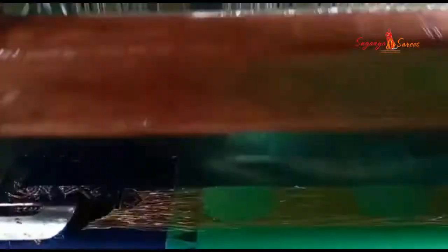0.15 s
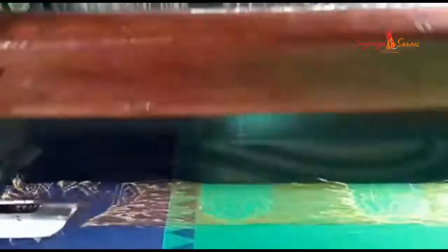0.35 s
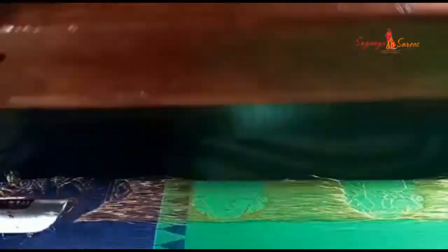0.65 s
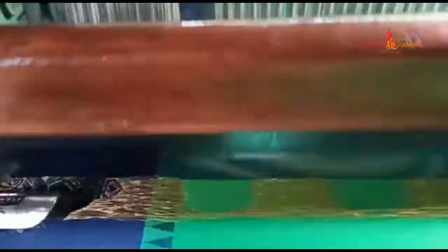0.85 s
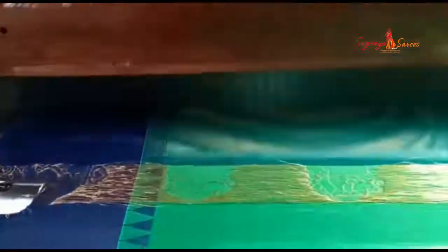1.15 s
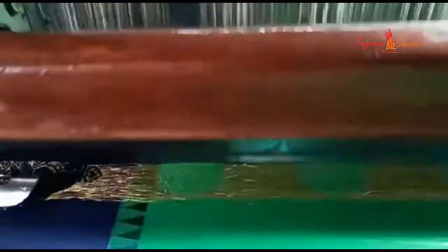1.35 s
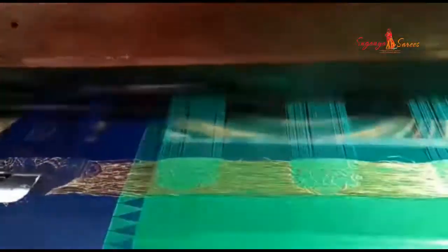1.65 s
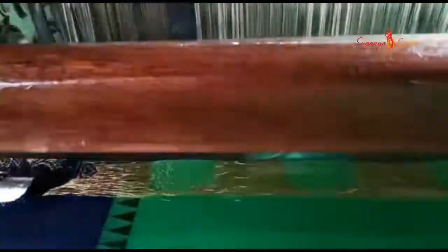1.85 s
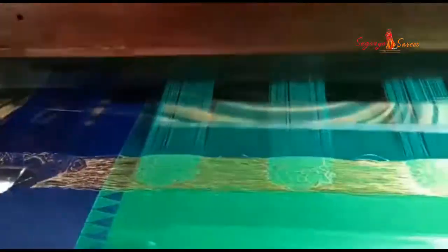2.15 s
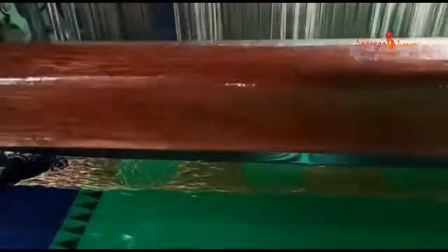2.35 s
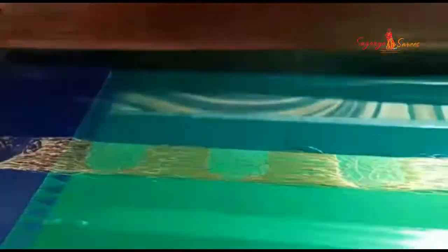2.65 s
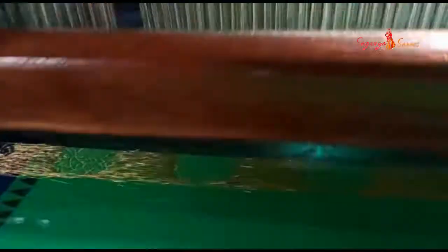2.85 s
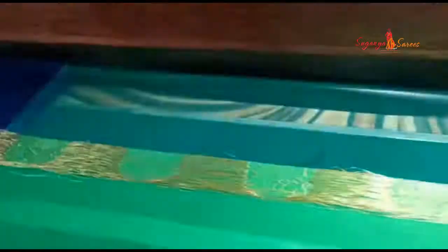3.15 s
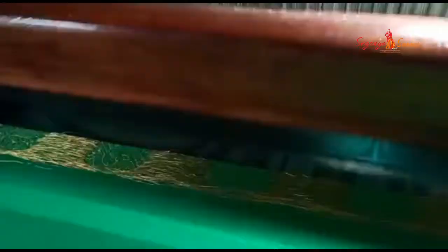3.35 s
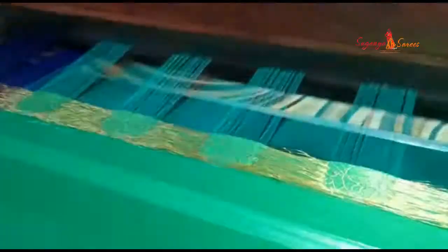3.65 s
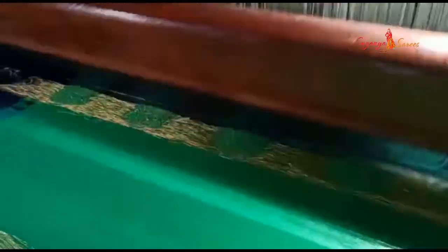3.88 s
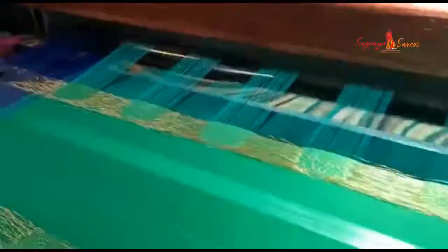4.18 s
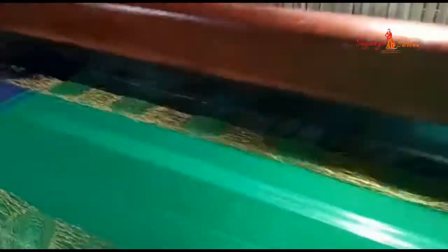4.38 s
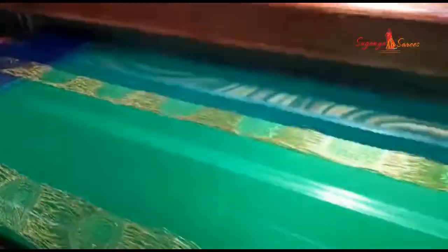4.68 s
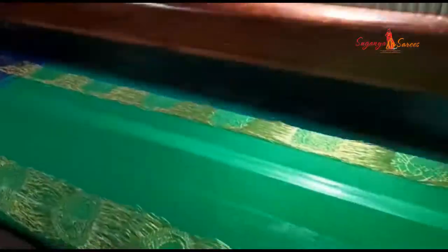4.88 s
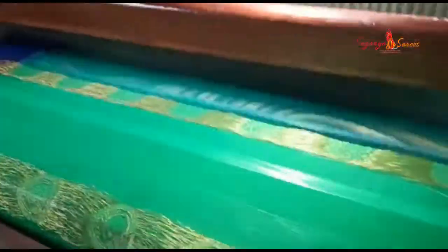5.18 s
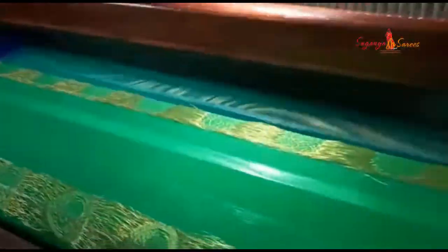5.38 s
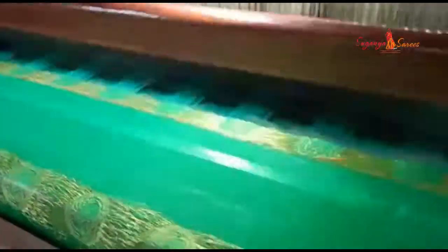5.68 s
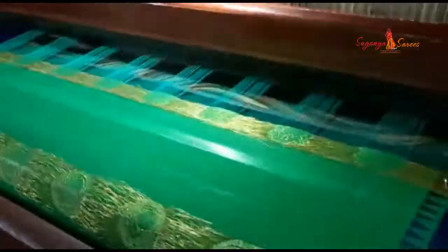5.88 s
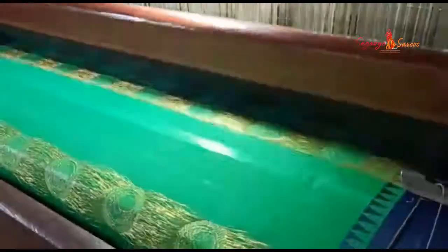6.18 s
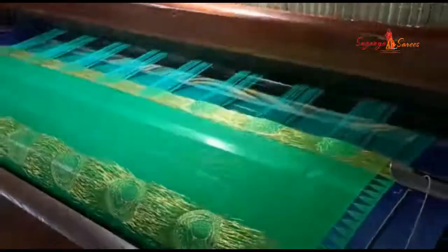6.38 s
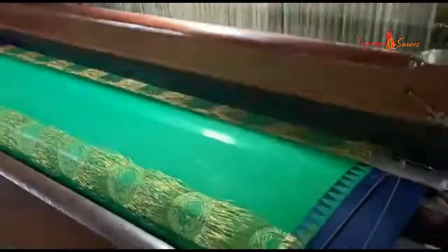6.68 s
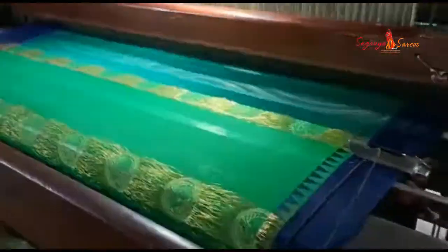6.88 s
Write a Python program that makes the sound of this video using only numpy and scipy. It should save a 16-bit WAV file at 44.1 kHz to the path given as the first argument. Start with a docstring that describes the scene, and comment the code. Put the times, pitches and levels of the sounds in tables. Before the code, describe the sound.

Harsh, rhythmic shuttle loom banging in a weaving shed, with rattling throws, a ringing loose link, and a second loom drifting through the beat.

```python
"""A shuttle power loom weaves close by, two picks every 1.06 s: the picker throws the shuttle, the box catches it,
the far picker throws it back with a rattle and a loose link rings. The picker and lever of a slightly faster loom
drift through this rhythm. Each blow is a short judder of contacts, noise coloured by wood and steel, over swishing
threads and the drive's steady clatter. One slap echo follows; two microphones hear the treble from the right."""
import sys
import numpy as np
from scipy import signal
from scipy.fft import rfft, irfft, next_fast_len
from scipy.io import wavfile
from scipy.ndimage import uniform_filter1d, map_coordinates

SR = 44100
rng = np.random.default_rng(int(sys.argv[2]) if len(sys.argv) > 2 else 0)


def store_pcm(level_fs):
    """Save levels as 16-bit WAV."""
    pcm = np.round(np.clip(level_fs, -1, 1) * 32767).astype(np.int16)
    wavfile.write(sys.argv[1], SR, np.atleast_2d(pcm).T)


N = 310023

# Blows: [t/s, level/dB, wooden knock/dB, steel brightness/dB]; levels are before each part's gain,
# knock and brightness are relative to the part's usual colour
# the near picker throws the shuttle out, once a cycle
PICK_BLOWS = [(-0.026, -17, -4.5, -3), (1.022, -14.5, -1.5, -4.5), (2.076, -19.5, 3.5, 4),
              (3.141, -19.5, -0.5, 3.5), (4.203, -18.5, 1.8, 3), (5.267, -20.5, 0, 1), (6.329, -21, 2, 2.7)]
# the shuttle runs into its near box; every second time it rebounds
BOX_BLOWS = [(0.152, -19.5, -3, -0.5), (1.225, -28.5, 7, -9), (1.29, -30, 4, 0), (2.275, -19.5, -1, -1),
             (3.348, -22.5, 1.5, -3.5), (3.385, -30.5, 6, 5), (4.392, -17.5, 0.5, -5),
             (5.44, -25, 7.5, -3.5), (5.476, -29, 0, 4.5), (6.516, -23, 2, 3)]
# the far picker throws the shuttle back, with a rattle
FAR_PICK_BLOWS = [(0.495, -24, 2.5, -2.5), (1.545, -27.5, 2, -0.5), (2.612, -23, 5, -7),
                  (3.655, -28.5, 5, -2), (4.727, -24.5, 3, -1), (5.8, -23.5, -2.5, -3), (6.85, -22, -2, -2)]
# resonances of the loom frame: [f/Hz, width/Hz, lift/dB]
FRAME_MODES = [(851, 9.8, 3.2), (1273, 23, 6), (1990, 35, 1), (2466, 22, 2.4), (3962, 86, 4.2),
               (4530, 47, 3.1), (4600, 35, 1.7), (6430, 39, 4.7), (6820, 30, 1.7), (6460, 38, 5.5)]

CYCLE_S, CYCLE_START_S = 1.0625, 1.016
BEAT_AT_S, BEAT_WIDTH_S = 0.17, 0.094  # the beater's stroke within the cycle
LULL_AT_S, LULL_WIDTH_S = 0.66, 0.044  # swish and clatter drop briefly


def amp(db):
    """Decibels to gain."""
    return 10 ** (np.asarray(db) / 20)


def rms(x):
    """Root mean square."""
    return np.sqrt(np.mean(np.abs(x) ** 2) + 1e-20)


def along(points, hz):
    """(Hz, value) points read on a log axis."""
    f, v = np.transpose(points)
    return np.interp(np.log(hz + 1), np.log(f + 1), v)


def wobble(rate, size):
    """A smooth random curve, rate knots a second."""
    knots = rng.standard_normal(int(size * rate / SR) + 4)
    return map_coordinates(knots, [np.arange(size) * rate / SR])


def swell(at, width, every):
    """A bell from 0 to 1 that peaks at seconds into the loom's cycle and comes back every so many seconds."""
    since_peak = np.arange(N) / SR - CYCLE_START_S - at
    away = (since_peak + every / 2) % every - every / 2
    return np.exp(-.5 * (away / width) ** 2)


def filtered(x, response):
    """x times a complex response of frequency."""
    size = x.shape[-1]
    padded = next_fast_len(size + SR // 10, True)
    spectrum = rfft(x, padded) * response(np.fft.rfftfreq(padded, 1 / SR))
    return irfft(spectrum, padded)[..., :size]


def part(hz, body, ring):
    """Response of a loom part, of unit power: a broad body with narrow resonances standing on it."""
    peaks = 0
    for centre, width, lift_db in ring:
        resonance = 1j * hz * width / (centre * centre - hz * hz + 1j * hz * width)
        peaks = peaks + (amp(lift_db) - 1) * resonance
    response = amp(along(body, hz)) * (1 + peaks)
    return response / rms(response)


def struck_anew(hz, body, ring, vary_db):
    """No two blows land alike: each favours other groups of the part's many modes."""
    groups = map_coordinates(rng.standard_normal(120), [hz / 200], mode="nearest")  # a knot every 200 Hz
    response = part(hz, body, ring) * amp(vary_db * groups)
    return response / rms(response)


def contacts(size, rate, rough_db):
    """A dense run of tiny contacts: two independent noises of unit power whose shared force flutters."""
    x = rng.standard_normal((2, size)) * amp(rough_db * wobble(rate, size))
    return x / rms(x)


def patchy(x, patchy_db):
    """Loose parts chatter by turns, so the colour shifts from moment to moment."""
    z = signal.stft(x, nperseg=512)[2]
    field = rng.standard_normal(z.shape[1:])
    field = uniform_filter1d(field, size=5, axis=0)  # over frequency
    field = uniform_filter1d(field, size=9, axis=1)  # over time
    return signal.istft(z * amp(patchy_db * field / rms(field)), nperseg=512)[1][:, :N]


def add(track, s, sound):
    """Mix a sound into a track at time s, cut at both ends of the track."""
    start = min(round(s * SR), N - 1)
    sound, start = sound[:, max(-start, 0):], max(start, 0)
    track[:, start:start + sound.shape[1]] += sound[:, :N - start]


def alike(table, knock_db, bright_db):
    """(s, level dB) rows as blows of one colour."""
    return [(s, db, knock_db, bright_db) for s, db in table]


def blows(table, body, ring, gain_db, rise, hold, t60, knock_lag, room_db, rough_db, vary_db, slack_db):
    """Each blow takes up its slack, judders and dies away; heavy wood builds later than steel (times in s)."""
    track, t = np.zeros((2, N)), np.arange(-SR // 20, SR // 2) / SR
    room_t60, slack_time = .5, .014  # s
    wood = lambda hz: 1 / (1 + (hz / 2300) ** 4)  # share of the wood in each frequency
    slack = amp(slack_db) * np.exp(-np.abs(t) / slack_time)  # loose joints rattle around the moment of the blow

    def judder(lag):
        age = np.maximum(t - hold - lag, 0)
        onset = 1 - np.exp(-np.maximum(t, 0) / (rise + lag + 1e-4))
        fall = np.maximum(amp(-60 * age / t60), amp(room_db - 60 * age / room_t60))
        return contacts(len(t), 217.6, rough_db) * np.maximum(onset * fall, slack)

    for s, db, knock_db, bright_db in table:
        knock = filtered(judder(knock_lag), lambda hz: np.sqrt(wood(hz)))
        clash = filtered(judder(0), lambda hz: np.sqrt(1 - wood(hz)))
        tilt = [(1900, knock_db), (2800, 0), (3900, 0), (4900, bright_db)]
        colour = lambda hz: amp(along(tilt, hz)) * struck_anew(hz, body, ring, vary_db)
        add(track, s + t[0], amp(db + gain_db) * filtered(knock + clash, colour))
    return track


def shuttle():
    """The near picker throws the shuttle; the near stick hits its buffer, the shuttle stops in either box."""
    # bodies: [f/Hz, density/dB per Hz]
    pick_body = [(100, -26), (400, -26), (1000, -6.5), (2000, -7.5), (3400, -4.5), (4500, -1.5),
                 (7000, -1.2), (14000, -8)]
    box_body = [(100, -38), (400, -18.5), (1000, -8), (2000, 0.5), (3400, 0.5), (4500, 1.5), (7000, 2.5),
                (14000, -12)]
    stop_body = [(60, -31), (300, -12.5), (900, 0), (1700, 2.5), (2600, -6.5), (4500, 6.5), (8000, -4.5),
                 (15000, -43)]
    # resonances: [f/Hz, width/Hz, lift/dB]
    pick_modes = [(4580, 50, 8.5), (4490, 150, 2.5), (6400, 300, -2), (7240, 44, -4), (8900, 80, 7)]
    box_modes = [(3150, 50, 4), (4280, 40, 3.3), (6350, 270, 3.4), (6300, 40, 2.5), (6650, 50, 2.4)]
    # the shuttle runs into the far box: [t/s, level/dB]
    far_catches = [(0.738, -26.5), (1.785, -22.5), (2.832, -22.5), (3.892, -22), (4.958, -26.5),
                   (6.012, -25.5)]
    thrown = blows(PICK_BLOWS, pick_body, pick_modes, gain_db=2.5, rise=0.0027, hold=0.025, t60=0.19,
                   knock_lag=0.0076, room_db=-15.5, rough_db=2.25, vary_db=-0.2, slack_db=-9)
    caught = blows(BOX_BLOWS, box_body, box_modes, gain_db=1, rise=0.0015, hold=0.036, t60=0.4,
                   knock_lag=.006, room_db=-14, rough_db=1.0, vary_db=2.5, slack_db=-7)
    # the near stick hits its buffer just after each pick
    near_stops = [(s + .024, -31, 0, 1) for s, *_ in PICK_BLOWS]
    stops = near_stops + alike(far_catches, knock_db=-1.1, bright_db=-4.5)
    stopped = blows(stops, stop_body, FRAME_MODES, gain_db=3.5, rise=0.0019, hold=0.011, t60=0.37,
                    knock_lag=0.002, room_db=-21, rough_db=0.0, vary_db=4.5, slack_db=-13)
    return thrown + caught + stopped


def warp():
    """Threads swish as the reed sweeps through them; blows of both pickers and the near box snap heald wires."""
    # colour of threads and wires: [f/Hz, density/dB per Hz]
    warp_body = [(2000, -33), (5000, -17), (7500, 3), (10000, -11.5), (13000, 0.5), (16000, -0.5)]
    colour = lambda hz: amp(along(warp_body, hz))
    sweep_db = 3 * swell(BEAT_AT_S, BEAT_WIDTH_S, CYCLE_S)
    lull_db = -8 * swell(LULL_AT_S, LULL_WIDTH_S, CYCLE_S)
    slack_db = -17 * swell(0.81, 0.094, 2 * CYCLE_S)  # quiet late in every second cycle
    uneven_db = 3.5 * wobble(14, N)
    swish = filtered(contacts(N, 700, 2.6), colour)
    swish = swish / rms(swish) * amp(-37.5 + sweep_db + lull_db + slack_db + uneven_db)

    snaps, t = np.zeros((2, N)), np.arange(SR // 10) / SR
    crack_and_buzz = amp(-60 * t / 0.0054) + amp(-3.0 - 60 * t / 0.18)
    # snap gain in dB, on top of the blow's level and brightness
    for table, snap_db in [(FAR_PICK_BLOWS, 11), (BOX_BLOWS, 4), (PICK_BLOWS, 2.5)]:
        for s, db, _, bright_db in table:
            add(snaps, s, amp(db + bright_db + snap_db) * crack_and_buzz * contacts(len(t), 590, 2.7))
    return swish + filtered(snaps, colour)


def drive():
    """Gears and shafts rumble and clatter in the frame, harder as the beater strokes; the motor hums unsteadily."""
    # body of the drive: [f/Hz, density/dB per Hz]
    drive_body = [(30, -40), (60, -17.5), (110, -9.5), (280, -3.5), (600, -2.5), (1300, 0.5), (2400, -0.5),
                  (4200, 0.34), (7000, -2.5), (9500, -15.5), (14000, -17.5)]
    t = np.arange(N) / SR
    first = swell(BEAT_AT_S, BEAT_WIDTH_S, CYCLE_S)
    second = swell(BEAT_AT_S + CYCLE_S / 2, BEAT_WIDTH_S, CYCLE_S)
    mid_cycle = swell(0.5, 0.093, CYCLE_S)
    lull = swell(LULL_AT_S, LULL_WIDTH_S, CYCLE_S)
    coast = swell(0.95, 0.045, CYCLE_S)  # the drive coasts towards the next pick

    low = lambda hz: 1 / (1 + (hz / 1000) ** 4)  # share of the rumble in each frequency
    frame = lambda hz: part(hz, drive_body, FRAME_MODES)
    rumble = filtered(contacts(N, 40, 1.7), lambda hz: frame(hz) * np.sqrt(low(hz)))
    chatter = patchy(contacts(N, 90, 1.43), patchy_db=2.5)
    clatter = filtered(chatter, lambda hz: frame(hz) * np.sqrt(1 - low(hz)))
    # idle level in dB, then its change at each moment of the cycle
    rumble = rumble / rms(rumble) * amp(-44.5 + 3 * first + 4 * second - 3 * coast)
    clatter = clatter / rms(clatter) * amp(-32.5 + first + mid_cycle - lull)

    hum_hz = 108
    hum_level = amp(-66.5 + 6.6 * wobble(8.2, N))
    hum = hum_level * np.sin(2 * np.pi * hum_hz * t + 1.3 * wobble(11, N))
    return rumble + clatter + hum


def neighbour():
    """The next loom runs a little faster, so its picker and steel lever drift through the rhythm."""
    # its picker: [t/s, level/dB]
    next_picks = [(0.712, -18.5), (1.76, -20), (2.808, -17.5), (3.858, -19.5), (4.906, -20), (5.951, -20),
                  (7.002, -22)]
    # its steel lever drops: [t/s, level/dB, wooden knock/dB, steel brightness/dB]
    lever_drops = [(0.39, -30, 4, 5), (1.432, -32, -4, 5), (2.487, -35, -17, 5), (3.527, -23.5, -4, -3),
                   (4.582, -23, -6.5, -3), (5.625, -26, 0.5, -1.5), (6.68, -32.5, -23, -4)]
    # bodies: [f/Hz, density/dB per Hz]
    picker_body = [(100, -33), (400, -18), (1000, -6), (2000, -4), (3400, -1), (4500, -2.5), (7000, -5),
                   (14000, -14.5)]
    lever_body = [(100, -31), (400, -22), (1000, -6), (2000, -5.5), (3400, -1.5), (4500, 2), (7000, -6),
                  (14000, -19.5)]
    # resonances: [f/Hz, width/Hz, lift/dB]
    picker_modes = [(3210, 40, 4), (3260, 47, 4.7), (3650, 36, 2.1), (3820, 100, 4.7), (5600, 50, 5.2),
                    (6370, 72, 5.1)]
    lever_modes = [(2590, 150, 6.9), (3350, 48, 4.6), (3844, 60, 4.5), (3750, 90, 4)]
    picks = alike(next_picks, knock_db=-5.5, bright_db=-.5)
    picker = blows(picks, picker_body, picker_modes, gain_db=2.5, rise=0.0012, hold=0.014, t60=0.28,
                   knock_lag=0.006, room_db=-12.5, rough_db=0.8, vary_db=0.5, slack_db=-8.5)
    lever = blows(lever_drops, lever_body, lever_modes, gain_db=5.5, rise=0.0017, hold=0.0094, t60=0.26,
                  knock_lag=.003, room_db=-5.5, rough_db=2.0, vary_db=1.6, slack_db=-10)
    return picker + lever


def far_picker():
    """The far picker throws the shuttle back with a long rattle, after a lighter clack."""
    # body: [f/Hz, density/dB per Hz]
    far_body = [(100, -28), (400, -11.5), (1000, -2.5), (2000, -0.3), (3400, -3), (4500, -1.5), (7000, 1.5),
                (14000, -5)]
    # resonances: [f/Hz, width/Hz, lift/dB]
    far_modes = [(1306, 33, 7.4), (2060, 200, 4.3), (6550, 67, 7.5), (7150, 56, 4.5), (7340, 65, 8),
                 (8500, 60, 5)]
    # a lighter, thinner clack just before each blow
    clacks = [(s - .051, db - 5.5, -7.5, 0) for s, db, *_ in FAR_PICK_BLOWS]
    return blows(FAR_PICK_BLOWS + clacks, far_body, far_modes, gain_db=2.5, rise=0.0021, hold=0.023,
                 t60=0.39, knock_lag=0.0083, room_db=-1, rough_db=2.0, vary_db=1.6, slack_db=-5.5)


def loose_link():
    """A loose link rings in a narrow steely band and bounces once, softer."""
    # the link rings: [t/s, level/dB]
    link_taps = [(.922, -32), (1.44, -32), (2.005, -29), (2.488, -28), (3.02, -33), (4.04, -28),
                 (4.09, -29.5), (5.11, -23), (6.142, -23)]
    # body: [f/Hz, density/dB per Hz]
    link_body = [(100, -25), (400, -38), (1000, -55), (2000, -14), (3400, 11.5), (4500, 0), (7000, -8),
                 (14000, -21)]
    # resonances: [f/Hz, width/Hz, lift/dB]
    link_modes = [(3260, 60, 6), (3310, 72, 6.9), (3430, 110, 6), (3630, 160, 7.2), (3880, 60, 5)]
    bounces = [(s + .048, db - 10) for s, db in link_taps]
    taps = alike(link_taps + bounces, knock_db=0, bright_db=0)
    return blows(taps, link_body, link_modes, gain_db=0.5, rise=.0005, hold=0.0069, t60=0.18,
                 knock_lag=0.0025, room_db=-16, rough_db=0, vary_db=-1.0, slack_db=-7)


def placed(x):
    """Two microphones: the bass is mostly alike in both and leans left, the treble is broad and leans right."""
    # likeness of left and right: [f/Hz, correlation]
    likeness = [(40, 0.33), (90, 0.89), (280, 0.87), (500, 0.35), (800, 0.41), (1100, -0.047),
                (1500, -0.011), (2200, 0.11), (3000, 0.028)]
    # balance: [f/Hz, left minus right/dB]
    balance = [(60, 8), (99, 2), (160, 2.5), (270, 4.5), (450, 0.5), (740, -1), (1220, -5), (2010, -12),
               (3330, -14.5), (5500, -13.5), (9080, -13.5), (15000, -8.5)]
    turn = lambda hz: np.arccos(np.clip(along(likeness, hz), -1, 1)) / 2
    mid, side = filtered(x, lambda hz: np.array([np.cos(turn(hz)), np.sin(turn(hz))]))
    lean = lambda hz: np.arctan(amp(along(balance, hz)))
    gains = lambda hz: np.sqrt(2) * np.array([np.sin(lean(hz)), np.cos(lean(hz))])
    return filtered(np.array([mid + side, mid - side]), gains)


def slap(x, delay, share):
    """One hard echo close behind the sound (delay in s) gives it a hollow colour."""
    return filtered(x, lambda hz: (1 + share * np.exp(-2j * np.pi * hz * delay)) / np.hypot(1, share))


def scene():
    """Both looms and their echo."""
    clacks = patchy(shuttle() + neighbour() + far_picker() + loose_link(), patchy_db=1.5)
    looms = placed(clacks + warp() + drive())
    return slap(looms, delay=.017415, share=.48)


def record(dry):
    """The highest peaks are rounded off; the overall tone is dull above 8 kHz."""
    # overall tone colour: [f/Hz, level/dB]
    tone_colour = [(20, -12), (55, -0.5), (4700, -0.5), (4850, -6), (6000, -4), (6200, 1.5), (7600, -1.5),
                   (8450, -3.5), (8700, -11.5), (9700, -27), (11500, -18), (11800, -5.5), (16000, -10)]
    ceiling, top_hz = 0.53, 16000
    rounded = dry / (1 + (dry / ceiling) ** 4) ** (1 / 4)
    return filtered(rounded, lambda hz: amp(along(tone_colour, hz)) * (hz < top_hz))


dry = scene()
out = record(dry)
store_pcm(out)
```